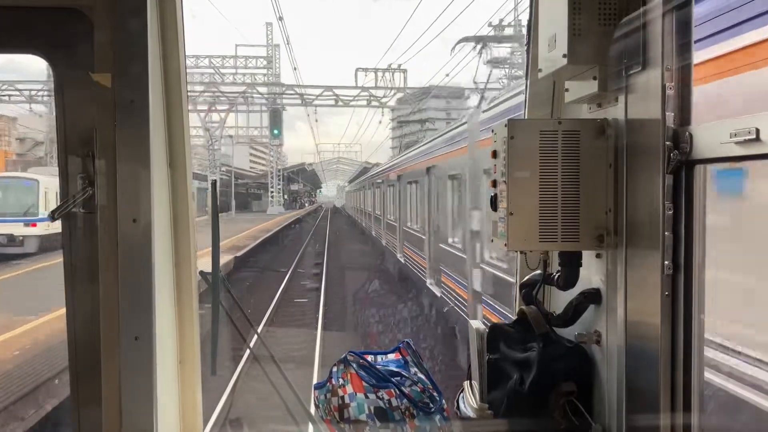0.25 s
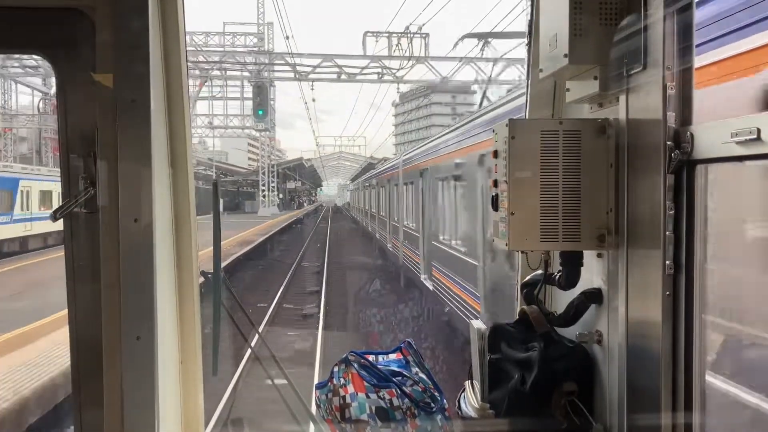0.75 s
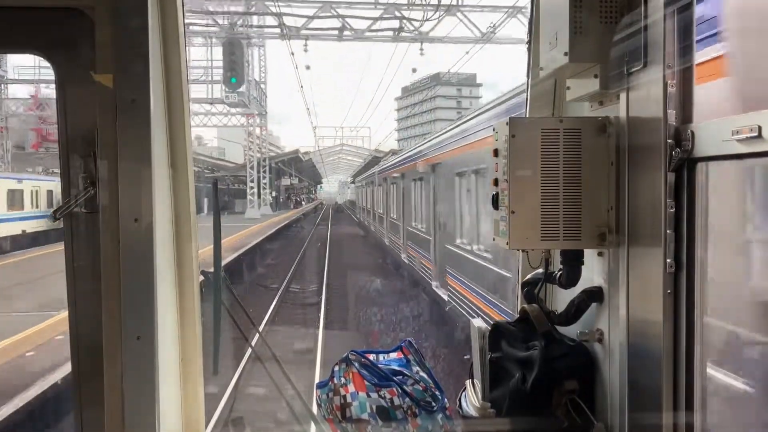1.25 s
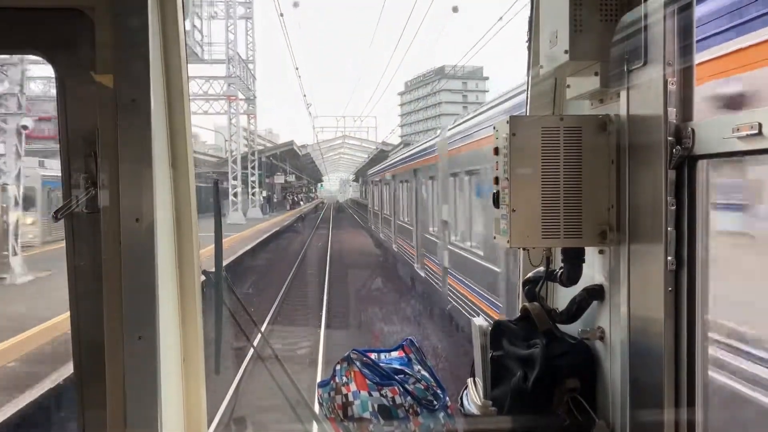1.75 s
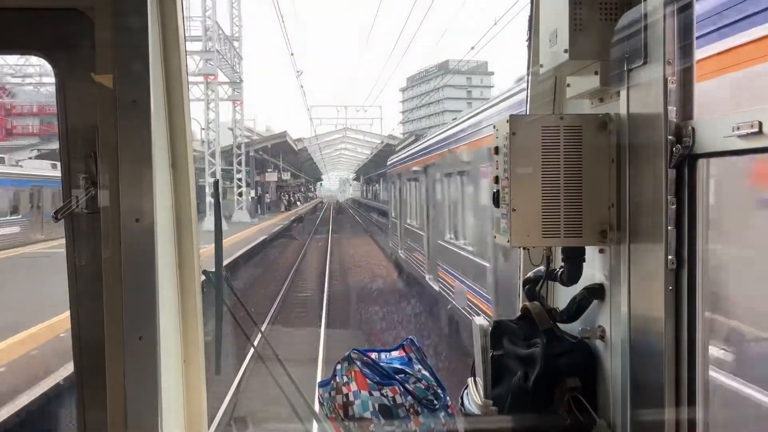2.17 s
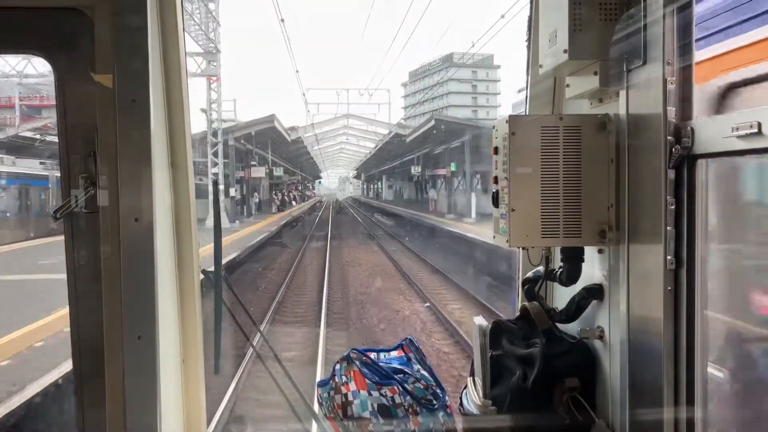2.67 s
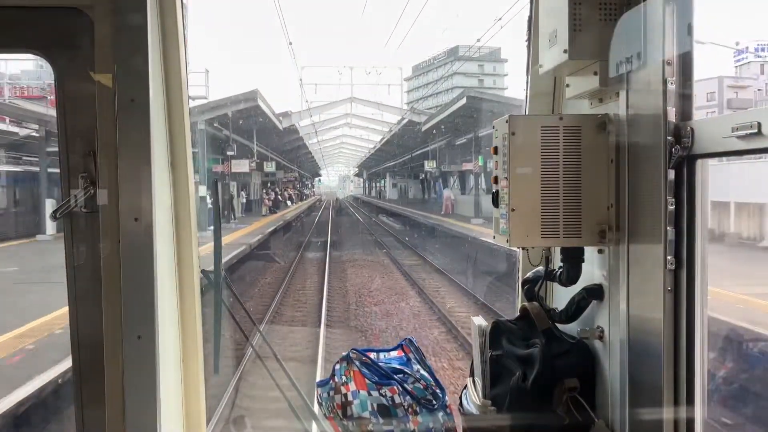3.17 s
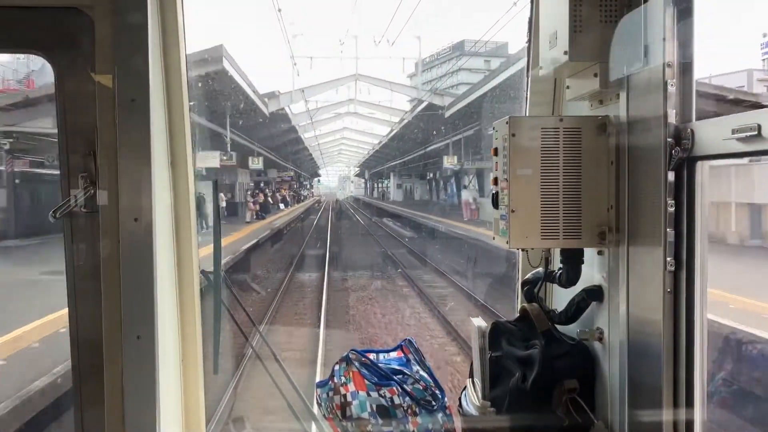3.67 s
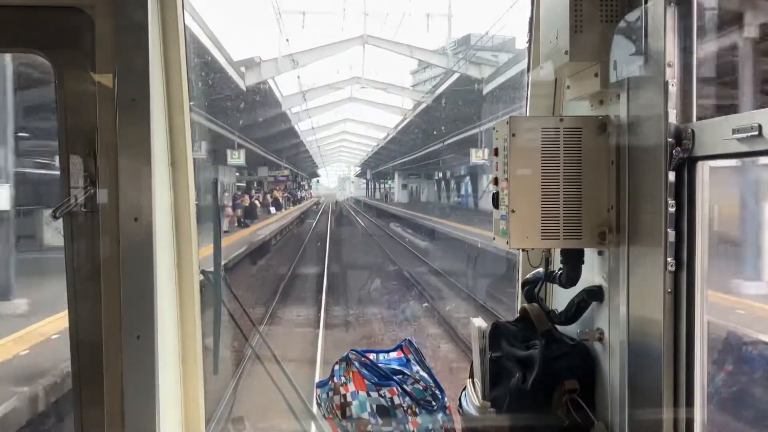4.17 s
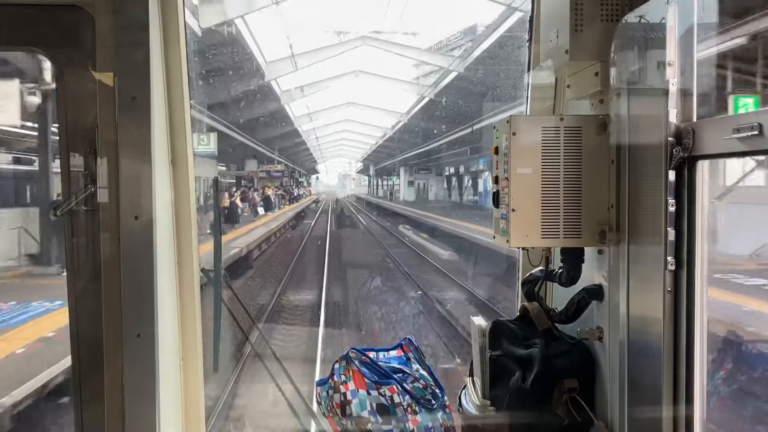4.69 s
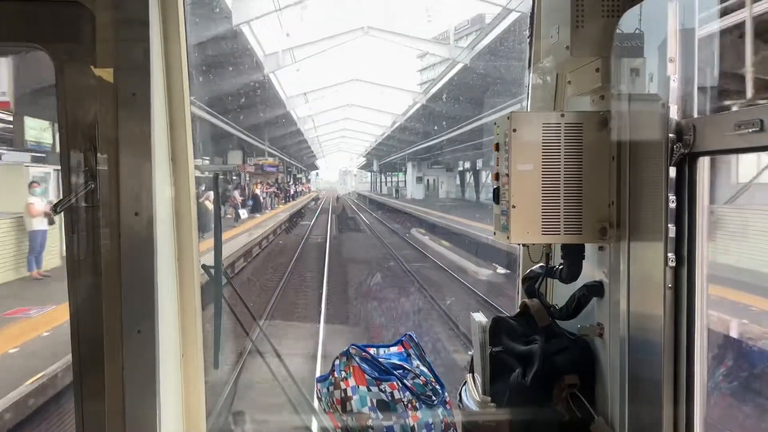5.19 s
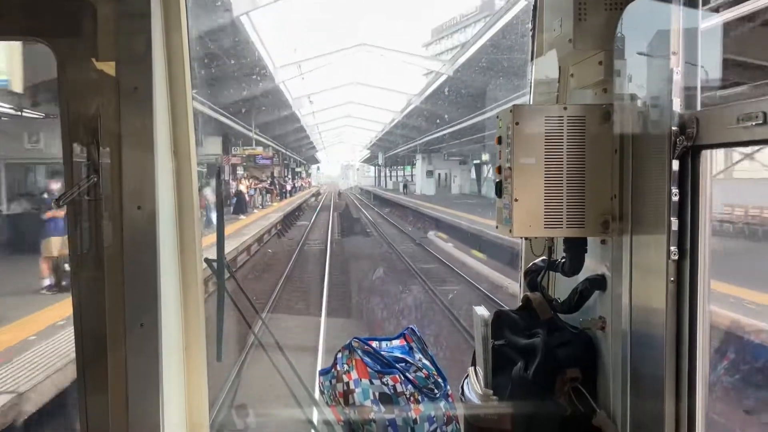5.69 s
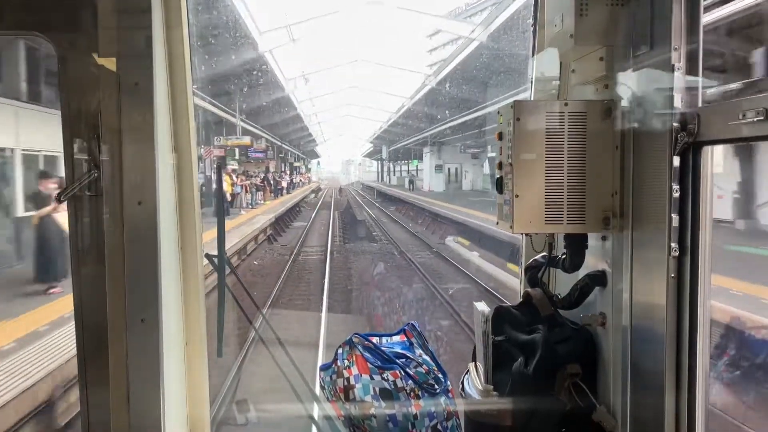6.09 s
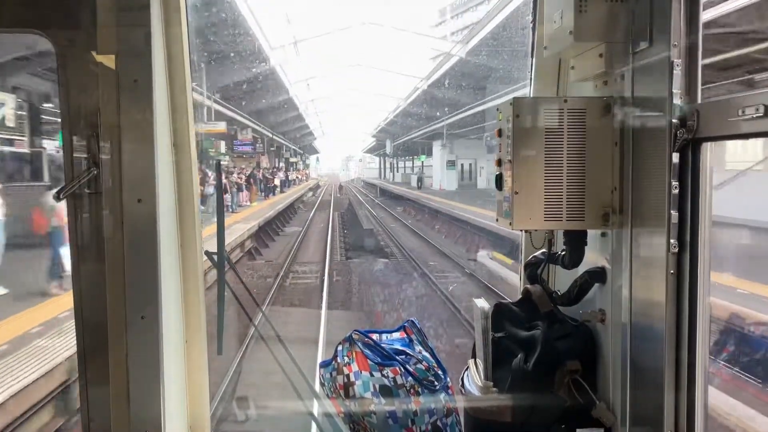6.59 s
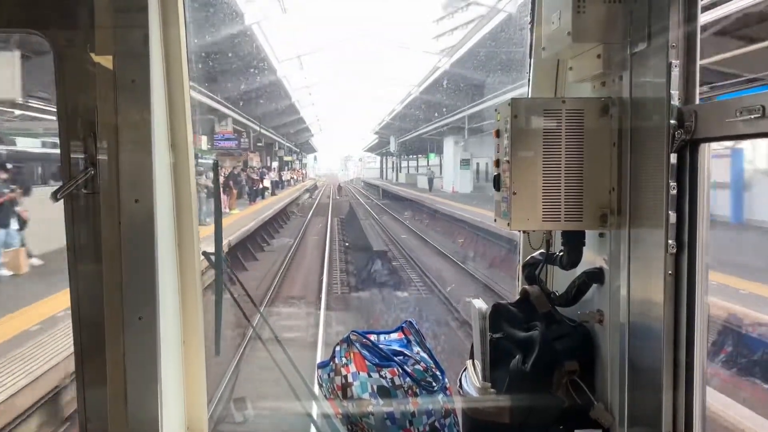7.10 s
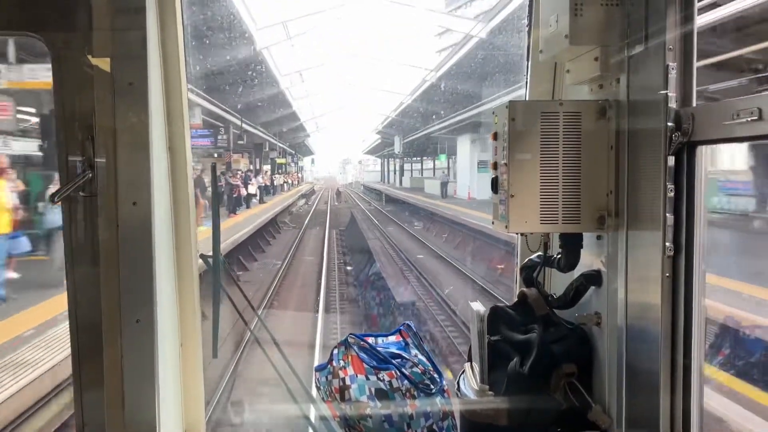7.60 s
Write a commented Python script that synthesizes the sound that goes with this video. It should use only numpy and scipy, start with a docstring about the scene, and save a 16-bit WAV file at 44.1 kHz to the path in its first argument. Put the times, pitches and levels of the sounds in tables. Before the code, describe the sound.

Low humming train heard from the cab: rumble, airy hiss, a brief motor whine, thin flange whistles, and clattering thuds over rail joints.

```python
"""An electric train makes its car body boom on one low note, heard inside the cab at a steady pace.
The boom is a sine with weak overtones; rumble, roar and hiss of the wheels are filtered noise.
A motor whine, made of a roughened tone, comes and goes over two steady, wavering machine tones.
Blows and rebounds at rail joints thud, ring and knock as short bursts of noise and decaying sines.
Wheel flanges moan and sing as wandering tones, wheels scrape, and a fitting creaks in short sines."""
import sys
import numpy as np
from scipy import signal
from scipy.fft import rfft, irfft
from scipy.io import wavfile
from scipy.ndimage import uniform_filter1d

SR = 44100
rng = np.random.default_rng(int(sys.argv[2]) if len(sys.argv) > 2 else 0)


def master(y):
    """Save y as 16-bit WAV."""
    cut = np.clip(np.atleast_2d(y).T, -1, 1)
    pcm = np.round(cut * 32767)  # scale
    wavfile.write(sys.argv[1], SR, pcm.astype(np.int16))


N = 346185
TIME = np.arange(N) / SR
FREQ = np.maximum(np.fft.rfftfreq(N, 1 / SR), 1)

# ringing notes of the bogie, the wheel frame under the car: centre_hz, width_hz, level_db
BOGIE_MODES = [(138.4, 33, 3.5), (195.5, 28, 4.5), (239, 27, -7), (277, 25, 2), (413, 41, -3),
               (544, 220, -2.5)]
# relative spectrum of a steel clack heard through the floor: frequency_hz, level_db (per Hz)
CLACK_SPECTRUM = [(400, -12), (1200, 0), (2500, -3), (4400, -7), (6000, -20), (9000, -40), (16000, -65)]


def undb(db):
    """Turn decibels into gain."""
    return 10 ** (np.asarray(db) / 20)


def unit(x):
    """Scale a sound to an rms (average strength) of 1."""
    return x / np.sqrt(np.mean(x ** 2) + 1e-24)


def curves(table):
    """Join each column of a table by straight lines in time; the first column is seconds."""
    seconds, *columns = np.transpose(table)
    return [np.interp(TIME, seconds, column) for column in columns]


def lasting(table):
    """Give 1 between the first and last rows of a curve, else 0."""
    return (TIME > table[0][0]) & (TIME < table[-1][0])


def swell(start, length):
    """Rise and fall once, from 0 to 1 and back, along half a sine."""
    return np.sin(np.pi * np.clip((TIME - start) / length, 0, 1))


def walk(rate):
    """Wander smoothly at random with a spread near 1, with `rate` new targets a second."""
    knots = rng.standard_normal(int(N / SR * rate) + 2)
    path = np.interp(TIME * rate, np.arange(len(knots)), knots)
    return 1.06 * uniform_filter1d(path, int(SR / rate / 2) + 1)


def turns(hz):
    """Add up a changing pitch in Hz into the phase of a wave, in radians."""
    return 2 * np.pi * np.cumsum(hz) / SR


def colour(points):
    """Gain at every frequency, drawn through (Hz, dB) points."""
    hz, db = np.transpose(points)
    return undb(np.interp(np.log(FREQ), np.log(hz), db))


def resonance(hz, width):
    """Response of one ringing mode, with gain 1 at its centre."""
    return 1 / (1 + 1j * (FREQ ** 2 - hz ** 2) / (FREQ * width))


def modes(table):
    """Add the responses of several ringing modes."""
    return sum(undb(db) * resonance(hz, width) for hz, width, db in table)


def through(x, response):
    """Filter a sound by a frequency response."""
    return irfft(rfft(x) * response, N)


def jitter(width_hz):
    """Random amplitude and phase of a resonance driven by roughness: slow complex noise."""
    a, b = through(rng.standard_normal((2, N)), 1 / (1 + 1j * FREQ / width_hz) ** 2)
    return unit(a) + 1j * unit(b)


def pan(left_db):
    """Gains of the two channels for a left-minus-right level in dB."""
    return undb(np.array([[left_db], [-left_db]]) / 2)


def field(response):
    """Filtered noise at both ears: alike in the bass, diffuse in the middle, mostly one wave at the top."""
    # width of the sound: frequency_hz, side_minus_mid_db
    width_curve = [(30, -25), (60, -19), (110, -26), (200, -9.5), (380, -4.5), (700, -3), (1290, 2.5),
                   (2380, 0), (4400, 0), (7000, -0.5), (11000, 7)]
    # lean of the sound to one side: frequency_hz, left_minus_right_db
    lean_curve = [(60, -2), (110, -3), (200, -1.5), (380, 0.5), (700, 1), (1290, 0), (2380, 1), (4400, 1),
                  (8120, -1), (15000, 2.5)]
    direct_from_hz, direct_share, ear_lag_s = 6400, 0.93, 0.000222
    mid, side = rng.standard_normal((2, 2 * len(FREQ))).view(complex)
    side = side * colour(width_curve)
    left, right = mid + side, mid - side
    # at the top, the left is mostly the right turned upside down and late
    top = FREQ > direct_from_hz
    late = -right[top] * np.exp(-2j * np.pi * FREQ[top] * ear_lag_s)
    left[top] = np.sqrt(1 - direct_share) * left[top] + np.sqrt(direct_share) * late
    lean = np.sqrt(colour(lean_curve))
    return unit(irfft(np.array([left * lean, right / lean]) * response, N))


def boom(waver_db=0.25, wander_hz=0.14, beat_wander_hz=0.62):
    """Running gear drives the lowest resonance of the car; a weaker second shaft beats against it."""
    # how hard the running gear drives the car body: time_s, level_db
    drive = [(0.0, -26), (0.3, -34), (0.53, -34), (0.7, -29), (0.85, -22), (0.93, -37), (1.2, -18),
             (1.29, -32), (1.46, -22), (1.58, -30), (1.66, -25.5), (1.94, -22.5), (2.03, -17.5),
             (2.12, -25.5), (3.45, -17.5), (3.52, -27.5), (3.71, -14.5), (3.78, -26), (3.87, -11.5),
             (4.0, -20.5), (4.09, -12), (4.57, -20), (4.79, -14), (4.94, -25), (5.03, -15), (5.12, -14.5),
             (5.21, -22), (5.3, -17.5), (5.62, -16.5), (6.05, -15.5), (6.14, -25), (6.19, -16), (6.24, -29),
             (6.28, -15), (6.45, -18.5), (6.75, -20), (6.84, -13), (7.05, -19.5), (7.3, -20.5),
             (7.65, -18.5), (7.85, -21)]
    boom_hz, beat_hz, beat_db = 87.34, 95.57, -34
    throb_hz, throb_width_hz = 83.24, 7.3
    throb_db, throb_fade_db_per_s = -34, 0.8
    db, = curves(drive)
    phase = turns(boom_hz + wander_hz * walk(5.6))
    # weak overtones waver at two and three times the note
    octave = undb(-23 + 3 * walk(9)) * np.sin(2 * phase)
    third = undb(-24 + 3 * walk(9)) * np.sin(3 * phase)
    note = undb(db + waver_db * walk(19)) * (np.sin(phase) + octave + third)
    beat = undb(beat_db) * np.sin(turns(beat_hz + beat_wander_hz * walk(2.793)))
    # rough rail rings nearly the same note unevenly, less so as the train runs in
    fade = undb(throb_db - throb_fade_db_per_s * TIME)
    throb = fade * field(resonance(throb_hz, throb_width_hz) ** 2)
    return np.sqrt(2) * (note + beat) * pan(-1.6) + throb


def shimmer(x, depth_db=1.0, grain_db=2.0, size=1024):
    """The hiss flickers at random: slowly in broad bands, faster and finer in narrow ones."""
    # cut the sound into small cells of frequency and time
    cells = signal.stft(x, nperseg=size)[2]
    broad, fine = rng.standard_normal((2,) + cells.shape[1:])
    broad = uniform_filter1d(uniform_filter1d(broad, size=19, axis=0), size=6, axis=1)
    fine = uniform_filter1d(uniform_filter1d(fine, size=2, axis=0), size=4, axis=1)
    gain = undb(depth_db * unit(broad) + grain_db * unit(fine))
    return unit(signal.istft(cells * gain)[1][:, :N])


def rolling(rumble_db=1.5, flicker_db=1.24, sway_db=0.33):
    """Rough rails shake the floor, roar in the body and hiss through the panels."""
    # relative spectra of the three noises: frequency_hz, level_db (per Hz)
    rumble_spectrum = [(18, -27), (27, -17), (38, 3), (50, 7), (70, 14), (86, 10.5), (105, 7.5), (135, -8),
                       (220, -66.5)]
    roar_spectrum = [(20, -8), (60, -0.5), (105, 7), (135, 2), (175, 1.5), (205, -3.5), (260, -1.5),
                     (330, -9.5), (400, -7), (520, -11.5), (680, -19), (900, -18.5), (1200, -35),
                     (2500, -72)]
    hiss_spectrum = [(400, -2.5), (900, 5.5), (1300, 1.5), (2000, 0), (2800, -5), (4000, -8.5), (5200, -11),
                     (6200, -14.5), (7800, -12.5), (9400, -24.5), (11000, -21), (13000, -37), (16000, -39)]
    # panel and wheel resonances that colour roar and hiss: centre_hz, width_hz, boost_db
    panel_modes = [(175, 18, 3.5), (243, 59, 4.5), (289.4, 9.9, 4), (355.7, 13.3, 5.5), (510, 52, 5.5),
                   (588, 8.2, 8), (770, 41, 8.5), (914, 30, 4.5), (980, 21, 4), (1487, 68, 6),
                   (1800, 47, 6), (2467, 45, 5), (3230, 160, 5)]
    # roughness of the track: time_s, rumble_level_db (before rumble_db is added)
    track = [(0, -31), (0.35, -24.5), (1.35, -31), (2.05, -26), (2.5, -30), (3.1, -27.5), (3.65, -24.5),
             (5.2, -31), (5.9, -26), (6.6, -31), (7.4, -29.5), (7.85, -28.5)]
    # rougher or smoother rail: start_s, length_s, roar_change_db, hiss_change_db (at the middle)
    stretches = [(0, 0.31, 2, 0), (1.696, 0.4, 1.5, 1.5), (2.196, 0.27, -1, 1.5), (3.6, .7, 0.5, -1),
                 (4.428, 1, -1.5, -1)]
    # the hiss fades slowly as the train runs in
    roar_db, hiss_db, hiss_fade_db_per_s = -26, -40.5, 0.09

    deep, = curves(track)
    body = roar_db
    rail = hiss_db - hiss_fade_db_per_s * TIME
    for start, length, roar_change, hiss_change in stretches:
        body = body + roar_change * swell(start, length)
        rail = rail + hiss_change * swell(start, length)
    panels = 1
    for hz, width, db in panel_modes:
        panels = panels * (1 + (undb(db) - 1) * abs(resonance(hz, width)) ** 2)
    sway = sway_db * walk(4.03)
    rumble = field(colour(rumble_spectrum)) * undb(deep + rumble_db)
    roar = field(colour(roar_spectrum) * panels) * undb(body + sway + flicker_db * walk(14))
    hiss = shimmer(field(colour(hiss_spectrum) * panels)) * undb(rail + sway)
    return rumble + roar + hiss


def tone(hz, wander_hz, waver_db):
    """A machine tone wanders a little and reaches each ear with its own phase."""
    phase = turns(hz + wander_hz * walk(25))
    ear_phase = rng.uniform(-0.86, 0.95, (2, 1))
    return np.sqrt(2) * undb(waver_db * walk(14)) * np.sin(phase + ear_phase)


def motors(rough=0.76, width_hz=24):
    """Electrical gear hums steady tones, and slow noise roughens the gliding traction whine."""
    # steady tones of the electrical gear: pitch_hz, level_db
    gear_tones = [(759, -63.5), (1136, -61.5)]
    # the traction whine: time_s, pitch_hz, level_db (before roughness and panning)
    whine_curve = [(.58, 378, -48), (.7, 360, -31.5), (.81, 349, -28), (.98, 356, -32), (1.22, 358, -36),
                   (1.32, 363, -27), (1.5, 360, -38), (1.65, 359, -32), (1.82, 380, -38), (2.06, 377, -32),
                   (2.2, 378, -43)]
    hz, db = curves(whine_curve)
    carrier = np.exp(1j * turns(hz))
    ear_phase = np.exp(0.8j * np.array([[0], [1]]))
    whine = (carrier * (1 + rough * jitter(width_hz)) * ear_phase).real
    whine = whine * undb(db) * lasting(whine_curve) * pan(5.2)
    return whine + sum(undb(db) * tone(hz, wander_hz=2.78, waver_db=5.0) for hz, db in gear_tones)


def scrapes():
    """Wheels rub briefly on the rail, each time in one resonance that may glide."""
    # start_s, length_s, middle_hz, glide_hz_per_s, width_hz, level_db (at the middle, before flicker)
    rubs = [(0, 0.37, 1960, -500, 400, -47), (.95, 0.34, 1785, 0, 150, -48.5),
            (2.197, 0.38, 5900, 0, 2900, -53.5), (3.05, 0.14, 608, 400, 39, -36.5),
            (3.153, 0.17, 2260, 1500, 390, -48.5), (3.599, 0.36, 7000, 0, 3500, -56),
            (3.74, 0.18, 240, 2, 11.4, -23.5), (6.984, 0.22, 6460, 0, 1100, -54),
            (6.991, 0.26, 7900, 0, 930, -54), (7.15, 0.64, 7800, 0, 1000, -56.5),
            (7.317, 0.25, 6640, -300, 170, -61)]
    out = np.zeros((2, N))
    for start, length, hz, glide, width, db in rubs:
        on = (TIME > start) & (TIME < start + length)
        # the complex form of the noise lets its pitch be bent
        rub = signal.hilbert(field(resonance(hz, width) ** 2)[:, on])
        bend = np.exp(1j * np.pi * glide * (TIME[on] - start - length / 2) ** 2)
        out[:, on] += undb(db) * swell(start, length)[on] * unit((rub * bend).real)
    return out * undb(walk(60))


def squeal(table, width_hz, ear_phase, octave_db, wander_hz=36, flutter_db=0.9, diffuse=0.35):
    """Flange friction feeds a wheel mode: a wandering tone breaks into grit and scatters round the cab."""
    hz, db, pure = curves(table)
    pure = np.clip(pure, 0, 1)
    phase = turns(hz + wander_hz * walk(45)) + ear_phase * np.array([[1], [0]])
    direct = np.sqrt(2 * pure) + np.sqrt(1 - pure) * jitter(width_hz)
    # the scattered part has opposite signs at the two ears
    scattered = diffuse * jitter(width_hz) * np.array([[1], [-1]])
    ears = ((direct + scattered) * np.exp(1j * phase)).real
    octave = undb(octave_db) * (np.exp(2j * phase) * jitter(3 * width_hz)).real
    return (ears + octave) * undb(db + flutter_db * walk(40)) * lasting(table)


def flanges():
    """Flanges excite wheel modes: low moans, then two sinking whistles, the lower taking over."""
    # all three: time_s, pitch_hz, level_db (before scatter and flutter), pure_share (0 to 1)
    # three wavering moans of a lower wheel mode, one table each
    moan_curves = [
        [(.06, 1913, -51, .8), (.1, 1936, -47, 0.9), (.18, 1950, -46, .8), (.205, 1835, -51, .6),
         (.3, 1770, -46, .6)],
        [(.54, 1850, -55, .7), (.6, 1950, -46, 0.6), (.67, 1865, -52, 0.5), (.76, 1920, -49, .7),
         (.83, 1870, -58, .6)],
        [(2.89, 1894, -58, .7), (2.93, 1860, -48, .8), (2.99, 1804, -48, .8), (3.05, 1810, -52, .6),
         (3.11, 1800, -58, .5), (3.17, 1850, -51, .7), (3.24, 1810, -57, .6)],
    ]
    # two higher wheel modes
    high_curve = [(4.06, 7940, -64, .2), (4.17, 7880, -53, 0.1), (4.36, 7820, -49.5, .1),
                  (4.55, 7740, -51, .1), (4.7, 7680, -50.5, 0.2), (4.89, 7640, -54, .2),
                  (4.97, 7570, -47, 0.8), (5.12, 7700, -47.5, .6), (5.24, 7620, -54, .4),
                  (5.54, 7560, -54.5, 0.7), (5.7, 7490, -65, .2)]
    low_curve = [(4.2, 7050, -64, .2), (4.36, 6930, -60, .3), (4.85, 6830, -60, 0.37),
                 (5.25, 6860, -54, 0.12), (5.5, 6860, -51.5, 0.22), (5.72, 6710, -52, .1),
                 (5.86, 6700, -60, 0.19), (6.0, 6850, -72, .2)]
    out = squeal(high_curve, width_hz=135, ear_phase=-1.2, octave_db=-20)
    out = out + squeal(low_curve, width_hz=200, ear_phase=0.05, octave_db=-46)
    for moan in moan_curves:
        out = out + squeal(moan, width_hz=48, ear_phase=1.6, octave_db=-30, wander_hz=6.7)
    return out


def cab(x, t60_s=0.34, wet_db=-2):
    """The cab adds a short, diffuse ring: fading noise that drops 60 dB in t60_s."""
    tail = rng.standard_normal((2, SR // 2)) * np.exp(-np.log(1000) * TIME[:SR // 2] / t60_s)
    tail = tail / np.linalg.norm(tail, axis=1, keepdims=True)
    return x + undb(wet_db) * signal.fftconvolve(x, tail, axes=1)[:, :N]


def creaks(unsteady_hz=34, vary_db=4.0, detune_hz=18):
    """A fitting sticks and slips through the same short tones, varying in force and pitch."""
    # strokes of the fitting: start_s, level_db (before the random force)
    strokes = [(.125, -53.5), (2.246, -52), (3.121, -58), (4.367, -51.5), (5.24, -56), (6.486, -53),
               (7.36, -56)]
    # resonances caught within one stroke: delay_s, length_s, pitch_hz, relative_level_db
    steps = [(0, 0.065, 3780, -4.5), (.02, .06, 4100, -8), (.03, .04, 4385, -12), (.02, .06, 3205, -6),
             (.043, 0.044, 3490, -1.5), (.085, .065, 3255, -2)]
    out = np.zeros(N)
    for delay, length, hz, step_db in steps:
        phase = turns(hz + unsteady_hz * walk(140))
        chances = rng.uniform(-1, 1, (len(strokes), 2))
        for (start, db), (force, bend) in zip(strokes, chances):
            on = (TIME > start + delay) & (TIME < start + delay + length)
            age = TIME[on] - start - delay
            sound = np.sin(phase[on] + 2 * np.pi * detune_hz * bend * age)
            level = undb(db + step_db + vary_db * force)
            out[on] += level * sound * np.sin(np.pi * age / length)
    return cab(np.sqrt(2) * out * pan(1.6))


def muffle(corner_hz):
    """The car floor passes what lies below a corner and cuts the rest steeply."""
    ratio = FREQ / corner_hz
    return 1 / (1 + 1j * np.sqrt(2) * ratio - ratio ** 2) ** 2


def joints(rise_s=0.006, swell_s=0.0077, thud_decay_s=0.028, ring_decay_s=0.053,
           clack_decay_s=0.048, focus_hz=210, ring_focus_hz=170):
    """Each blow or rebound at a joint chatters: the bogie thuds, the wheel rings, the steel clacks."""
    # blows and weaker rebounds at the joints:
    # start_s, thud_db (before panning), thud_hz, chatter_s, ring_db, ring_hz, clack_db
    blows = [(1.857, -27, 150.7, 0.11, -64, 840, -53), (1.996, -25.5, 150, 0.054, -60, 830, -46),
             (5.436, -24, 220, 0.048, -33, 800, -44.5), (5.497, -23, 195, 0.032, -47, 910, -59),
             (5.613, -20.5, 244, 0.043, -35, 900, -47), (5.671, -25, 231, 0.027, -35.5, 870, -49.5),
             (5.803, -23.5, 285, 0.058, -35.5, 890, -47), (5.983, -24.5, 248, 0.045, -37, 905, -43),
             (6.171, -17, 249, 0.032, -35, 820, -45.5), (6.225, -40, 267, 0.0071, -43, 800, -54),
             (6.355, -20, 202, 0.066, -39, 804, -46.5), (6.635, -24.5, 197, 0.06, -48, 860, -56),
             (6.82, -27, 217, 0.041, -50, 840, -62), (7.411, -26.5, 195, 0.084, -49, 850, -51),
             (7.6, -26.5, 188, 0.076, -46, 850, -66)]
    # ringing notes of the wheel: centre_hz, width_hz, level_db
    wheel_modes = [(590, 77, -26), (806, 81, -3.5), (900, 90, -5), (1120, 140, -10.5), (1387, 84, -10.5),
                   (1872, 67, 3)]
    out = np.zeros((2, N))
    bogie = rfft(field(modes(BOGIE_MODES) * muffle(540)))
    wheel = rfft(field(modes(wheel_modes) * muffle(2800)))
    clack = field(colour(CLACK_SPECTRUM))
    for start, thud_db, thud_hz, hold_s, ring_db, ring_hz, clack_db in blows:
        age = TIME - start
        # the fade begins once the chatter is over
        after = np.clip(age - hold_s, 0, 1)
        body = irfft(bogie * resonance(thud_hz, focus_hz) ** 2, N)
        thud = body * np.clip(age / rise_s, 0, 1) * np.exp(-after / thud_decay_s)
        # the thud level is set over its first 60 ms
        early = (age > 0) & (age < 0.06)
        out += undb(thud_db) * thud / np.std(thud[:, early]) * pan(-1)
        # the wheel already grinds on the worn rail end just before the thud
        grind = np.clip(age / swell_s + 0.5, 0, 1)
        ring = unit(irfft(wheel * resonance(ring_hz, ring_focus_hz), N))
        out += undb(ring_db) * ring * (grind * np.exp(-after / ring_decay_s))
        out += undb(clack_db) * clack * (grind * np.exp(-after / clack_decay_s))
    return out


def knocks(push_s=0.0027, decay_s=0.0058, steel_hz=830, steel_db=-22, steel_decay_s=0.008,
           bogie_db=-17, crack_db=-28, crack_decay_s=0.004):
    """A wheel hits a rail end: a short round ring with a steel tick and crack; the frame rings on faintly."""
    # hard knocks and their rebounds: start_s, level_db (before panning), pitch_hz
    hits = [(5.459, -9.5, 222), (5.614, -15, 215), (5.628, -14, 239), (5.694, -19, 250), (5.806, -18, 295),
            (5.829, -16, 280), (6.170, -11, 254), (6.184, -14, 240), (6.196, -10.5, 267),
            (6.232, -13.5, 250), (6.354, -11, 190), (6.372, -9, 201), (6.396, -10.5, 195)]
    out, crack = np.zeros((2, N))
    for start, db, hz in hits:
        on = (TIME > start) & (TIME < start + 0.1)
        age = TIME[on] - start
        shape = (1 - np.exp(-(age / push_s) ** 2)) * np.exp(-age / decay_s)
        ring = shape / shape.max() * np.sin(2 * np.pi * hz * age)
        tick = undb(steel_db) * np.exp(-age / steel_decay_s) * np.sin(2 * np.pi * steel_hz * age)
        out[on] += undb(db) * (ring + tick)
        crack[on] += undb(db + crack_db) * np.exp(-age / crack_decay_s)
    frame = undb(bogie_db) * through(out, modes(BOGIE_MODES))
    return (out + frame) * pan(-1) + crack * field(colour(CLACK_SPECTRUM))


def scene():
    """Add up everything heard in the cab."""
    return boom() + rolling() + motors() + scrapes() + flanges() + creaks() + joints() + knocks()


def record(dry, top_hz=15800):
    """A steep low-pass filter cuts the sound above top_hz."""
    low_pass = signal.ellip(8, 0.2, 70, top_hz, fs=SR, output="sos")
    return signal.sosfilt(low_pass, dry)


dry = scene()
out = record(dry)
master(out)
```